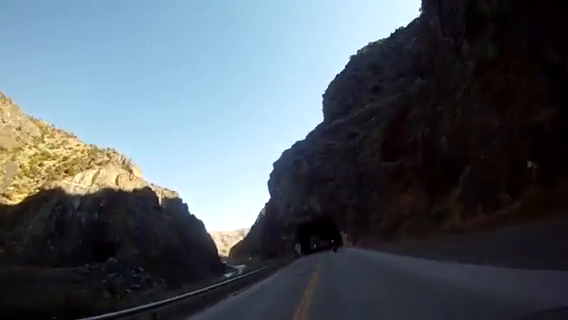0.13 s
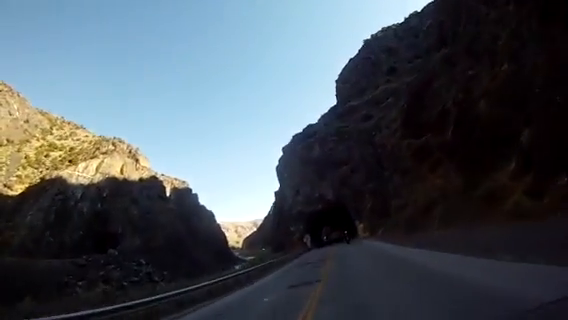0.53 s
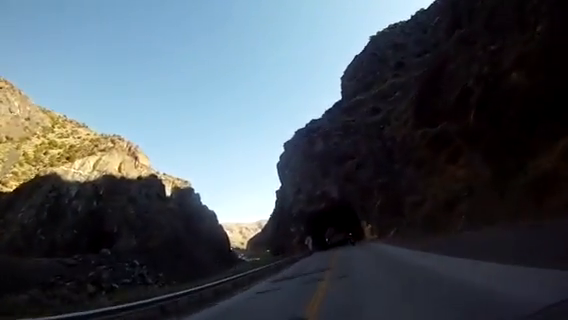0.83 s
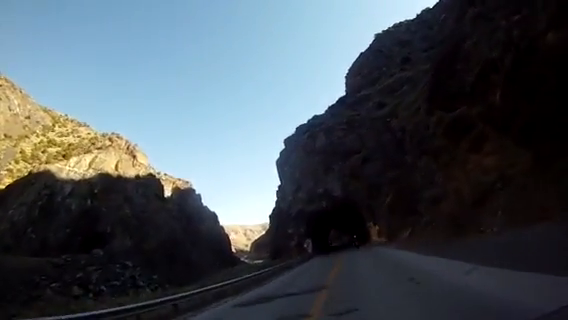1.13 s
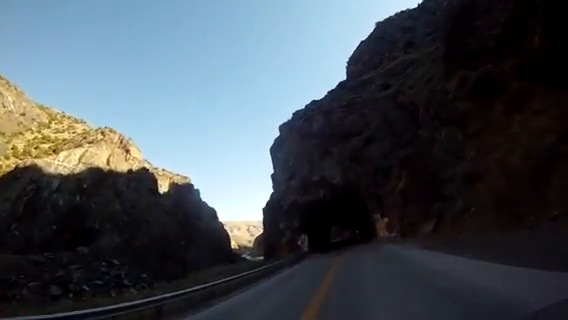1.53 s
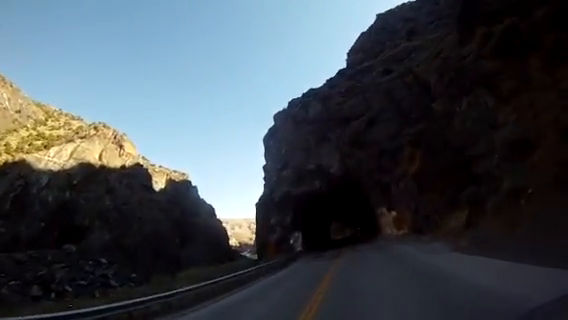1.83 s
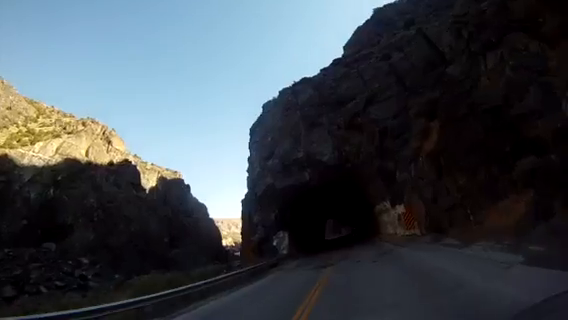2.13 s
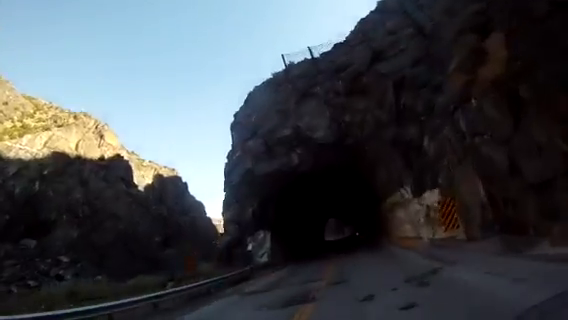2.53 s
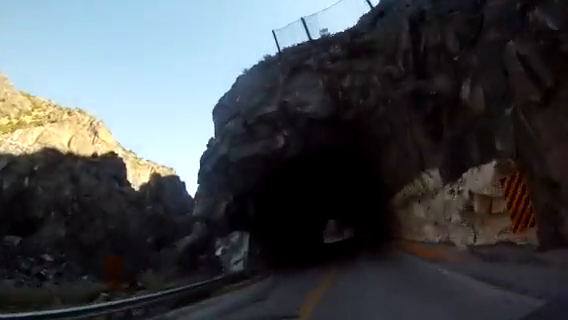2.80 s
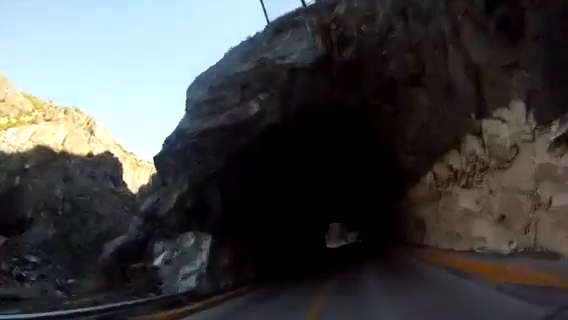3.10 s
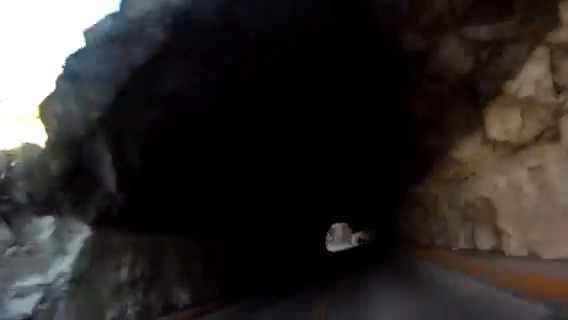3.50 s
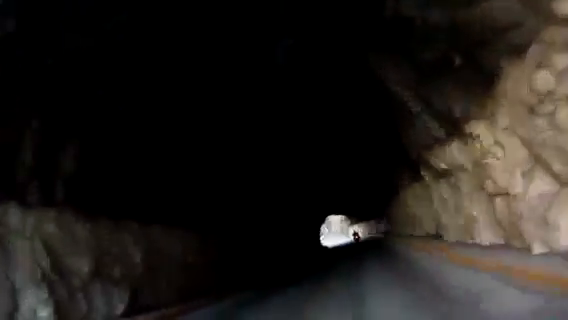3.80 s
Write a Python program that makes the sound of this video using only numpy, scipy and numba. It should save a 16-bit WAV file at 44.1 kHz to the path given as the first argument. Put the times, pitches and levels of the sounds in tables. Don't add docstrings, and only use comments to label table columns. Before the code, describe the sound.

Steady harsh wind noise on a driving car's outside microphone, engine humming, a brief buzzing rattle late.

```python
import sys
import numpy as np
from scipy import signal
from scipy.fft import rfft, irfft
from scipy.io import wavfile
from scipy.ndimage import uniform_filter1d
from numba import njit

SR = 44100
rng = np.random.default_rng(int(sys.argv[2]) if len(sys.argv) > 2 else 0)


def store_pcm(level_fs):
    pcm = np.round(np.clip(level_fs, -1, 1) * 32767).astype(np.int16)
    wavfile.write(sys.argv[1], SR, np.atleast_2d(pcm).T)


def gain_from_decibels(decibels):
    exponent = np.asarray(decibels, float) / 20
    return 10 ** exponent


N = 174195


def level(x, db):
    return x * gain_from_decibels(db) / np.sqrt(np.mean(x ** 2))


def curve(table, axis=1):
    rows = np.array(table, float)
    return np.interp(np.arange(N) / SR, rows[:, 0], rows[:, axis])


@njit
def moving_bandpass(x, hz, width, rate):
    y, band, low = np.empty(len(x)), 0., 0.
    for i in range(len(x)):
        g = np.tan(np.pi * hz[i] / rate)
        damping = width / hz[i]
        v = (band + g * (x[i] - low)) / (1 + g * (g + damping))
        band = 2 * v - band
        low = low + 2 * g * v
        y[i] = damping * v
    return y


def ring(x, hz, width):
    hz = hz * np.ones(N)
    once = moving_bandpass(x, hz, 1.64 * width, 1. * SR)
    return moving_bandpass(once, hz, 1.64 * width, 1. * SR)


def walk(rate):
    hold = int(SR / rate)
    steps = np.repeat(rng.standard_normal(N // hold + 1), hold)
    w = uniform_filter1d(uniform_filter1d(steps, hold), hold)[:N]
    return (w - w.mean()) / w.std()


def clicks(per_s, spread_db):
    chance = rng.random((3, N))
    hit = chance[0] < per_s / SR
    size = gain_from_decibels(-spread_db * np.log(chance[2] + 0.009))
    return hit * np.sign(chance[1] - .5) * size


def bands(shape, flicker_db, rate):
    points = np.array(shape, float)
    octave = np.log2(np.fft.rfftfreq(N, 1 / SR) + 1e-3)
    corners = np.log2(points[:, 0])
    spec = rfft(rng.standard_normal(N)) * gain_from_decibels(np.interp(octave, corners, points[:, 1], right=-200))
    spec = spec * np.minimum(1, 2 ** (2 * (octave - corners[0])))
    out = 0
    for centre in np.arange(3, 13.1, .5):
        share = np.cos(np.pi * np.clip(octave - centre, -.5, .5)) ** 2
        out = out + irfft(spec * share, N) * gain_from_decibels(flicker_db * walk(rate))
    return out


# f/Hz, density/dB per Hz
RUMBLE_COLOUR = [(18, -5), (30, 0), (60, -3.5), (95, 2.5), (150, -4.5), (250, -8), (450, -11.5),
                 (800, -16.5)]
# t/s, level/dB
BUFFET_SWELL = [(0.0, -34), (0.29, -35.5), (0.33, -36.5), (2.51, -37), (2.64, -42), (2.97, -34),
                (3.0, -39.5), (3.15, -36), (3.4, -38.5), (3.46, -35), (3.5, -38), (3.95, -37.5)]


def buffeting(eddies):
    swell = curve(BUFFET_SWELL)
    swell = gain_from_decibels(.7 * (swell - swell.mean()) + 0.28 * walk(9) + 0.93 * eddies)
    sucks = -np.abs(clicks(per_s=70, spread_db=2.5))
    thumps = level(ring(sucks, hz=160, width=268), -41)
    rumble = level(bands(RUMBLE_COLOUR, flicker_db=0.9, rate=18), -33)
    return (rumble + thumps) * swell


# t/s, level/dB
GUSTS = [(0, 2.5), (.12, -0.8), (.5, 0), (.9, -0.5), (1.03, 1.5), (1.35, 0.1), (1.6, -0.1), (1.9, -0.2),
         (2.3, 0), (2.52, -0.5), (2.63, -3), (2.75, 0), (2.9, 1.3), (3.1, -0.5), (3.27, 1), (3.55, 0.5),
         (3.95, -2.5)]
# f/Hz, density/dB per Hz
RUSH_COLOUR = [(300, -27), (600, -1.5), (900, -1), (1700, -2), (2600, 1.5), (3700, -2), (4100, -12),
               (6100, -13.5)]
# f/Hz, width/Hz, level/dB
CASE_MODES = [
    (974, 160, -44),
    (1195, 253, -34),
    (1563, 180, -42.5),
    (2146, 152, -33),
    (2117, 320, -31.5),
    (2570, 380, -49.5),
    (3587, 330, -42),
    (4790, 600, -48.5),
]


def case(eddies):
    taps = level(clicks(per_s=900, spread_db=3), -6.5)
    rings = 0
    for hz, width, db in CASE_MODES:
        drifting_hz = hz * (1 + 0.0055 * walk(5.03))
        mode = ring(taps + rng.standard_normal(N), drifting_hz, width)
        rings = rings + level(mode * gain_from_decibels(0.82 * walk(14)), db)
    rush = level(bands(RUSH_COLOUR, flicker_db=-1, rate=24.6), -33.5)
    return (rings + rush) * gain_from_decibels(curve(GUSTS) + 0.47 * eddies)


# t/s, firing f/Hz, hum level/dB
ENGINE_RUN = [
    (0, 110.5, -36.5),
    (.6, 109.5, -35.5),
    (1.3, 112.7, -36.5),
    (1.6, 112.5, -41.5),
    (2.1, 113.2, -34),
    (2.7, 114, -36),
    (3.2, 113.5, -32.5),
    (3.45, 114.3, -41),
    (3.7, 114.2, -36.5),
    (3.95, 115, -36),
]
# multiple of the firing rate, level/dB
HUM_PARTIALS = [
    (.5, -5),
    (1, -2),
    (1.5, -25.5),
    (2, -17.5),
    (2.5, -28),
    (4, -26),
]


def engine():
    firing_hz = curve(ENGINE_RUN) * (1 + 0.0025 * walk(6))
    turn = 2 * np.pi * np.cumsum(firing_hz) / SR
    load_db = 1.1 * walk(14)
    hum = 0
    for order, db in HUM_PARTIALS:
        hum = hum - gain_from_decibels(db + load_db + 1.2 * walk(9.23)) * np.cos(order * turn)
    cycle = np.round(turn / (4 * np.pi)).astype(int)
    scatter_db = 9.5 * np.clip(rng.standard_normal(N // 100), -2, 1.7)
    size = gain_from_decibels(scatter_db)[cycle]
    jolt = -size * np.exp(7.1 * (np.cos(turn / 2) - 1))
    jolt = jolt - uniform_filter1d(jolt, size=500)
    return (np.sqrt(2) * hum + level(jolt, -12.5)) * gain_from_decibels(curve(ENGINE_RUN, axis=2))


# t/s, level/dB
BUZZ_SWELL = [
    (2.77, -53),
    (2.82, -33.5),
    (2.9, -30),
    (3.02, -28.5),
    (3.09, -28),
    (3.17, -29.5),
    (3.28, -33.5),
    (3.4, -40.5),
    (3.65, -46),
]
# f/Hz, width/Hz, level/dB
BUZZ_MODES = [
    (3588, 136, 5.5),
    (3730, 120, -8),
    (3370, 120, 0.5),
    (4980, 500, -12.5),
]
# t/s, level/dB
HARD_KNOCKS = [
    (2.86, 7),
    (2.967, 5),
    (2.997, 7),
    (3.079, 8),
]


def buzz():
    taps = level(clicks(per_s=1600, spread_db=1.5), 0)
    taps = taps + gain_from_decibels(1) * rng.standard_normal(N)
    knocks = np.array(HARD_KNOCKS)
    taps[(knocks[:, 0] * SR).astype(int)] += gain_from_decibels(22 + knocks[:, 1])
    rings = 0
    for hz, width, db in BUZZ_MODES:
        rings = rings + level(ring(taps, hz * (1 + 0.0044 * walk(12)), width), db)
    return level(rings, 0) * gain_from_decibels(curve(BUZZ_SWELL))


def flare():
    peak_s, length_s = 3.224, 0.079
    swell = np.exp(-.5 * ((np.arange(N) / SR - peak_s) / length_s) ** 2)
    return level(ring(rng.standard_normal(N), hz=1240, width=110), -33) * swell


def scene():
    eddies = walk(27.99)
    return (buffeting(eddies) + case(eddies) + engine() + buzz() + flare())[None]


def roll_off(x):
    return signal.sosfilt(signal.butter(12, 16400, fs=SR, output="sos"), x)


def record(dry):
    hold_rate, edge_hz, top_hz = 12000, 5530, 15300
    f = np.fft.rfftfreq(N, 1 / SR)
    edge = np.clip((f - edge_hz) / (hold_rate / 2 - edge_hz), 0, 1)
    soft = irfft(rfft(dry) * gain_from_decibels(-16 * edge ** 1.7), N)
    slow = signal.resample(soft, round(N * hold_rate / SR), axis=1)
    held = np.repeat(slow, 4, axis=1)
    spec = rfft(signal.resample(held, N, axis=1))
    mix = irfft(spec * (f < top_hz), N)
    return roll_off(mix)


dry = scene()
out = record(dry)
store_pcm(out)
```